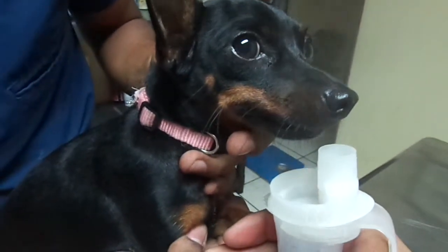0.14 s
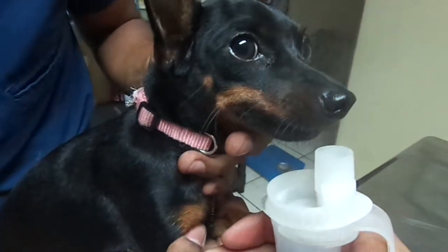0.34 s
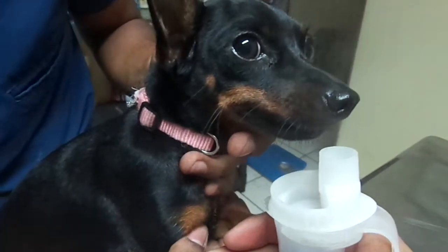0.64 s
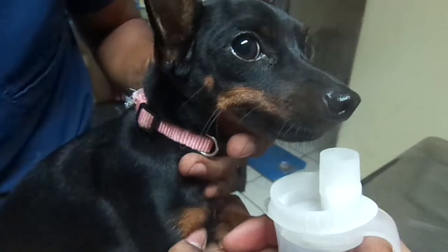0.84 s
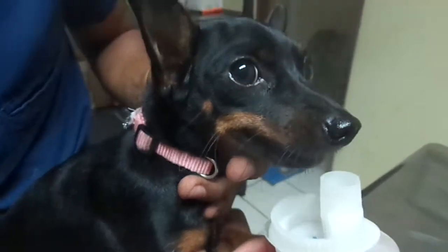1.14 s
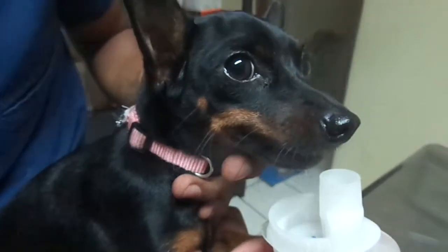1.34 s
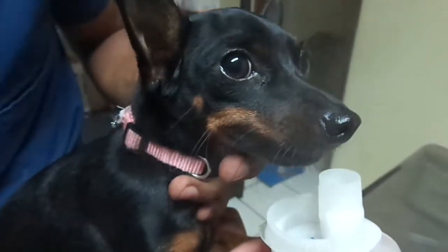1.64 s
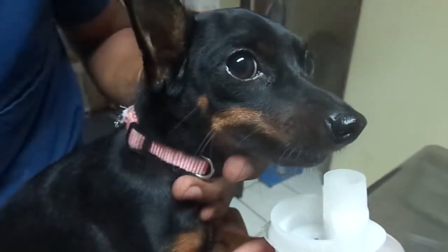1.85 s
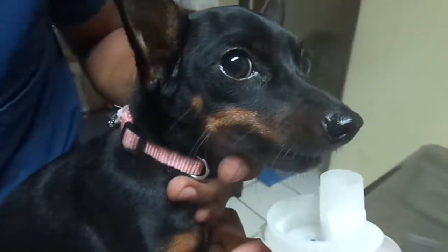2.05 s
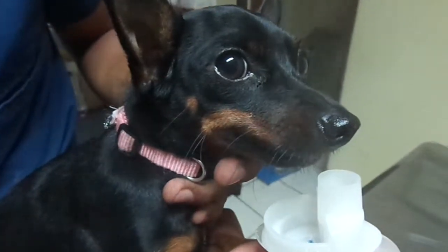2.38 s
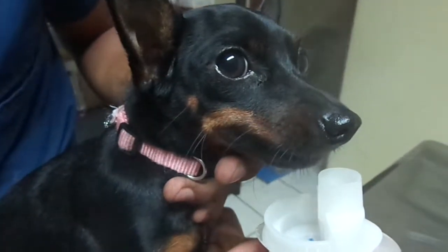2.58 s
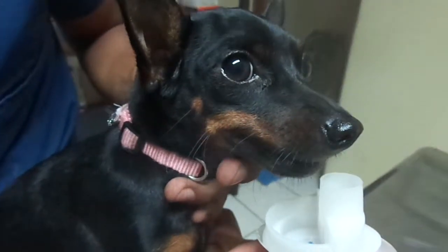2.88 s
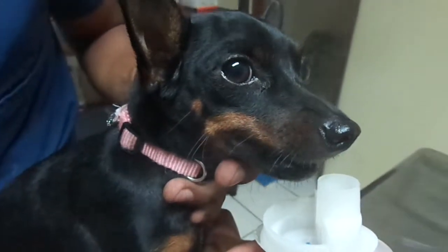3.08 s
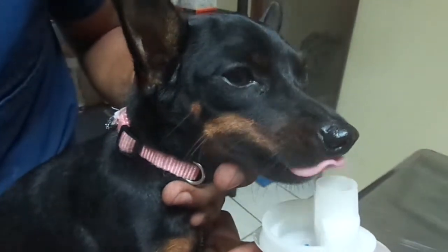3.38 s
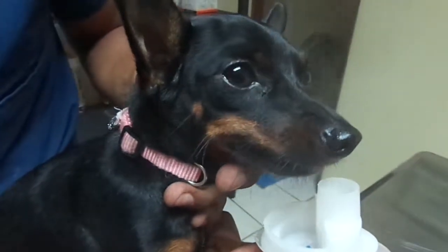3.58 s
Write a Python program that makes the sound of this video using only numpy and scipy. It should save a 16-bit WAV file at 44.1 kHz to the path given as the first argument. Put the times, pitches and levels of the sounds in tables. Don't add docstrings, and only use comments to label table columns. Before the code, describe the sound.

Steady compressor-driven nebulizer noise indoors: bright, raspy air jet with irregular gurgling swells, low motor drone and rumble beneath, recorded close, almost mono, running unchanged from start to end.

```python
import sys
import numpy as np
from scipy import signal
from scipy.fft import rfft, irfft
from scipy.io import wavfile
from scipy.ndimage import uniform_filter1d

SR = 44100
rng = np.random.default_rng(int(sys.argv[2]) if len(sys.argv) > 2 else 0)


def amplitude_ratio(level_db):
    exponent = np.asarray(level_db, float) / 20
    return 10 ** exponent


def digitize_waveform(pressure):
    field = np.atleast_2d(pressure).T
    bounded = np.clip(field, -1, 1)
    quanta = np.round(bounded * 32767).astype(np.int16)
    wavfile.write(sys.argv[1], SR, quanta)


N = 164052


def level(x, db):
    return x * amplitude_ratio(db) / np.sqrt(np.mean(x ** 2))


def walk(rate_hz):
    hold = int(SR / rate_hz)
    steps = np.repeat(rng.standard_normal(N // hold + 1), hold)
    drift = uniform_filter1d(uniform_filter1d(steps, hold), hold)[:N]
    return drift / drift.std()


def cavity(x, hz, width_hz):
    b, a = signal.iirpeak(hz, hz / (1.81 * width_hz), fs=SR)
    return signal.lfilter(b, a, signal.lfilter(b, a, x))


def jet(t):
    # centre in Hz, width in Hz, level in dB rms, share of gurgle, share of aim.
    cup = [(988.6, 48.4, -36.5, 0.19, 0.3), (1078, 83, -38.5, 0.17, 0.28), (1300, 470, -36.5, 0.38, 0.057),
           (2024, 910, -44, 0.37, 0.066), (2454, 330, -35.5, 0.57, 0.15), (3347, 395, -26.5, 1, 0.08),
           (3730, 400, -29, 1.16, 0.034), (4584, 810, -34, 0.39, 0.15)]
    nozzle = [(6720, 970, -33.5, 0.63, 0.15), (7740, 490, -29, 0.09, 0.085), (8700, 830, -41, 0.075, 0.092),
              (9960, 810, -40, 0.09, .5), (11250, 670, -39, 0.07, 1.5), (13200, 400, -41.5, .2, 1.7),
              (13500, 250, -35, 0.45, 2.3), (14400, 470, -27.5, 0.32, 2.4)]
    open_jet_hz, open_jet_db = 4500, -43
    flicker_hz, flicker_db = 18, 0.48
    rim_hz, rim_steady = 9000, .35

    gurgle_db = slug_swell(t)
    aim_db = cup_aim(t)
    chop_db = drop_chop(t) + nozzle_spit()

    spill_db = (-2 - rim_steady) * chop_db + .4 * aim_db
    spill = rng.standard_normal(N) * amplitude_ratio(spill_db)
    high = signal.butter(2, open_jet_hz, "high", fs=SR, output="sos")
    out = level(signal.sosfilt(high, spill), open_jet_db)

    cup_air = rng.standard_normal(N)
    for k, (hz, width_hz, db, gurgle_share, aim_share) in enumerate([*cup, *nozzle]):
        steady = rim_steady if hz > rim_hz else 0
        swell_db = gurgle_share * gurgle_db + aim_share * aim_db
        swell_db = swell_db + (1 - steady) * chop_db + flicker_db * walk(flicker_hz)
        air = cup_air if k < len(cup) else rng.standard_normal(N)
        out = out + (-1) ** k * level(cavity(air * amplitude_ratio(swell_db), hz, width_hz), db)
    return side_pockets(out)


def drop_chop(t):
    drop_hz, jitter, count = 85, .16, 600
    depth_db, scatter, runs, share = -10, 0.13, 0.13, .26
    cycles = np.clip(1 + jitter * rng.standard_normal(count), .3, None)
    edges_s = np.cumsum(cycles) / drop_hz
    phase = np.interp(t, np.r_[0, edges_s], np.arange(count + 1))
    size = 1 + scatter * rng.standard_normal(count) + runs * walk(6.6)[::200][:count]
    drop_db = depth_db * np.clip(size, 0, None)
    return drop_db[phase.astype(int)] * np.exp(-((phase % 1 - .5) / share) ** 2 * 2)


def nozzle_spit():
    spit_hz, spit_db = 330, 1.9
    return spit_db * 2 * np.tanh(walk(spit_hz) / 2)


def slug_swell(t):
    # centre in seconds, swell in dB, length in seconds.
    slugs = [(0.093, 4, 0.027), (0.166, 4, 0.014), (0.247, 6.5, 0.043), (0.404, 6.5, 0.025),
             (0.555, 2, 0.02), (0.635, 6.5, 0.039), (0.685, 4.5, 0.02), (0.813, 4.5, 0.026),
             (0.87, 8, 0.012), (1.212, 5, 0.026), (1.269, 5.5, 0.022), (1.337, 6.5, 0.028), (1.4, 4, 0.019),
             (1.711, 9, 0.018), (1.887, 4.5, 0.031), (2.052, 2.5, 0.017), (2.106, 6, 0.011),
             (2.216, 3.5, 0.018), (2.322, 3.5, 0.014), (2.408, 6.5, 0.016), (2.475, 5.5, 0.021),
             (2.569, 3.7, 0.023), (2.788, 4.5, 0.018), (2.874, 3, 0.023), (2.995, 3.1, 0.019),
             (3.036, 0.5, 0.031), (3.193, 3, 0.023), (3.328, 4, 0.025), (3.564, 7, 0.011),
             (3.732, 6.5, 0.073)]
    return np.max([db * np.exp(-((t - at_s) / length_s) ** 2 * 2) for at_s, db, length_s in slugs], axis=0)


def cup_aim(t):
    # time in seconds, level in dB.
    aim = [
        (0.0, -23.5),
        (0.52, -24.5),
        (0.65, -23.5),
        (0.94, -24),
        (1.43, -23),
        (1.44, -24),
        (2.72, -22.5),
        (2.78, -21.5),
        (3.72, -22.5),
    ]
    aim_db = np.interp(t, *np.array(aim).T)
    return aim_db - aim_db.mean()


def side_pockets(x):
    # centre in Hz, width in Hz, share removed.
    pockets = [(1800, 100, .45), (2150, 160, .5), (4350, 250, .4), (5600, 500, .4), (13950, 300, .4)]
    for hz, width_hz, share in pockets:
        b, a = signal.iirpeak(hz, hz / width_hz, fs=SR)
        x = x - share * signal.lfilter(b, a, x)
    return x


def pump(t):
    # multiple of the stroke rate, level in dB rms.
    harmonics = [(1, -64), (2, -76), (3, -51), (4, -55), (5, -40.5), (6, -51.5), (7, -47), (8, -52),
                 (9, -46.5), (10, -54), (20, -49.5), (21, -49.5), (23, -50), (24, -56), (25, -49.5),
                 (29, -64)]
    stroke_hz, drift, waver_db, scatter_rad = 82.872, .0003, .9, 0.19
    mains_hz, mains_db = 58, -74
    turn = 2 * np.pi * np.cumsum(stroke_hz * (1 + drift * walk(1.558))) / SR
    hum = amplitude_ratio(mains_db) * np.sin(2 * np.pi * mains_hz * t)
    for multiple, db in harmonics:
        start_rad = scatter_rad * multiple * rng.standard_normal()
        gain = amplitude_ratio(db + waver_db * walk(6.02))
        hum = hum + gain * np.sin(round(multiple) * turn + start_rad)
    return np.sqrt(2) * hum


def housing_rumble():
    # frequency in Hz, density in dB per Hz.
    housing = [(45, -19), (100, -15.5), (190, -17), (235, -6), (355, -8), (430, -1.5), (630, -6.5),
               (790, 7.5)]
    hz, db = np.array(housing).T
    f = np.arange(N // 2 + 1) * SR / N + 1
    shape = amplitude_ratio(np.interp(np.log(f), np.log(hz), db)) / (1 + (f / hz[-1]) ** 8)
    return level(irfft(rfft(rng.standard_normal(N)) * shape, N), -44.5)


def room(x):
    t60_s, room_db = .2, -15
    tail = rng.standard_normal(SR // 2) * amplitude_ratio(-60 * np.arange(SR // 2) / SR / t60_s)
    tail = tail / np.sqrt(np.sum(tail ** 2))
    return amplitude_ratio(room_db) * signal.fftconvolve(x, tail)[:N]


def scene():
    t = np.arange(N) / SR
    hiss = jet(t)
    return np.tile(hiss + room(hiss) + pump(t) + housing_rumble(), (2, 1))


def weak_holes(z, f, top_hz):
    share, low_hz, hole_db = .035, 1500, -16
    patch = uniform_filter1d(uniform_filter1d(np.abs(z) ** 2, size=9, axis=0), size=2, axis=1)
    patch = patch / np.sqrt(patch.mean(axis=1, keepdims=True) + 1e-18)
    band = (f > low_hz) & (f < top_hz)
    weak = np.quantile(patch[band], share) / (patch + 1e-18)
    return z * amplitude_ratio(hole_db * band[:, None] * np.clip(4 * (weak - .75), 0, 1))


def channel_split(z, f, t):
    # start in seconds, end in seconds.
    splits = [(0, .03), (.19, .31), (.6, .63), (.81, .92), (1, 1.1), (1.19, 1.27), (1.44, 1.49),
              (1.54, 1.59), (1.69, 1.73), (1.93, 1.97), (2.04, 2.11), (2.28, 2.41), (2.67, 2.74),
              (2.83, 2.88), (3.09, 3.18), (3.29, 3.32), (3.39, 3.51)]
    low_hz, split_db, density = 210, -6, .2
    active = sum((t >= a) & (t <= b) for a, b in splits) * (f[:, None] > low_hz)
    grain = (rng.random(z.shape) < density) * np.exp(2j * np.pi * rng.random(z.shape))
    return uniform_filter1d(np.abs(z), size=16, axis=0) * grain * active * amplitude_ratio(split_db)


def band_limit(x):
    return signal.sosfilt(signal.butter(12, 16040, fs=SR, output="sos"), x)


def record(dry):
    top_hz = 15000
    top_cut = signal.ellip(16, .2, 90, top_hz, fs=SR, output="sos")
    f, t, z = signal.stft(signal.sosfilt(top_cut, dry[0]), SR, nperseg=2048)
    z = weak_holes(z, f, top_hz)
    side = channel_split(z, f, t)
    both = signal.istft(np.array([z + side, z - side]), nperseg=2048)[1][:, :N]
    return band_limit(both)


dry = scene()
out = record(dry)
digitize_waveform(out)
```